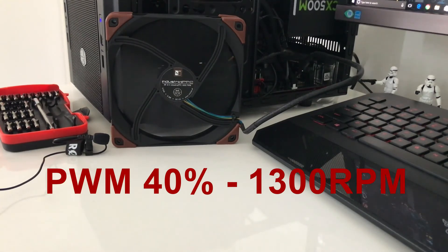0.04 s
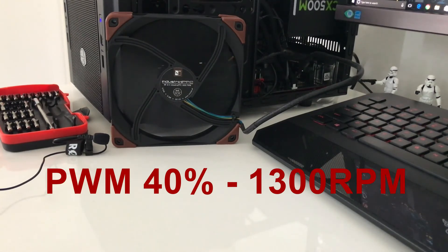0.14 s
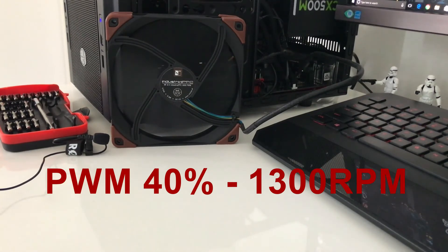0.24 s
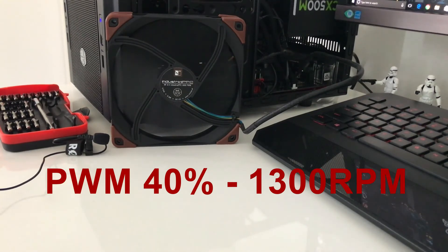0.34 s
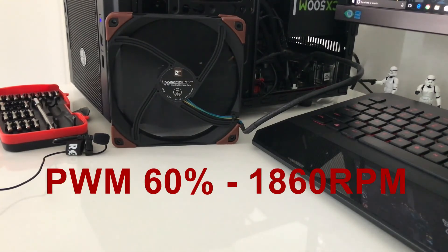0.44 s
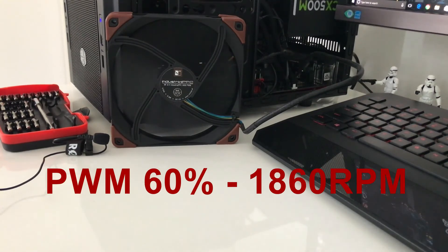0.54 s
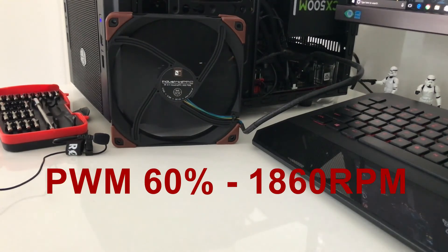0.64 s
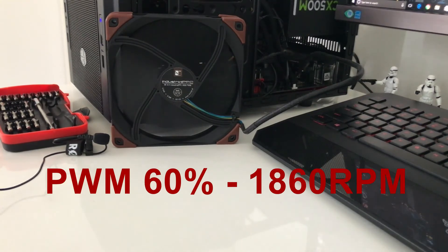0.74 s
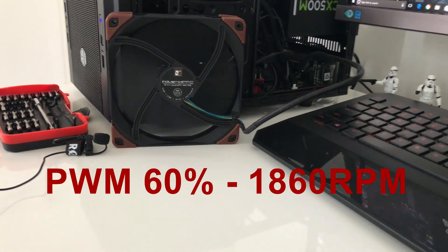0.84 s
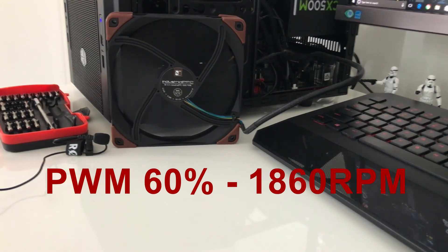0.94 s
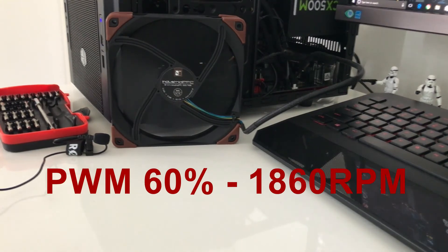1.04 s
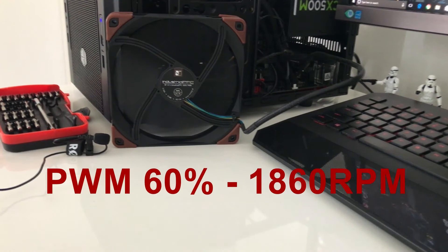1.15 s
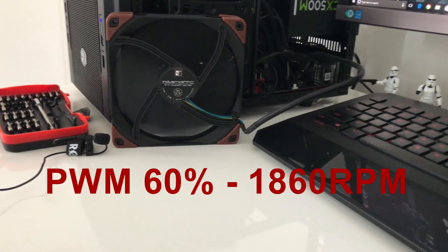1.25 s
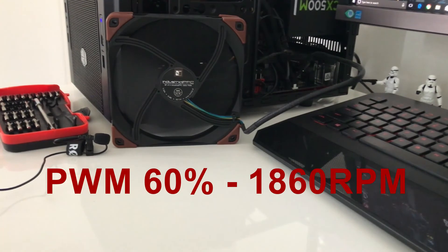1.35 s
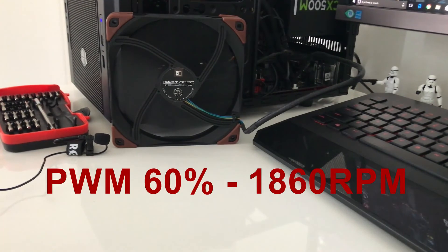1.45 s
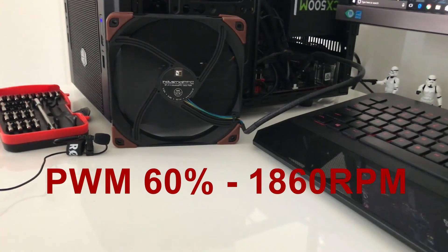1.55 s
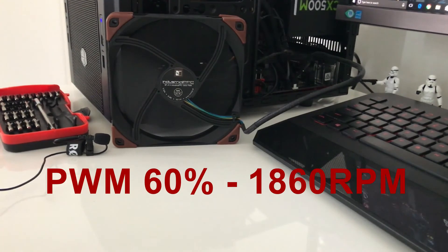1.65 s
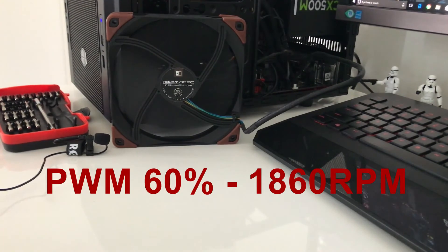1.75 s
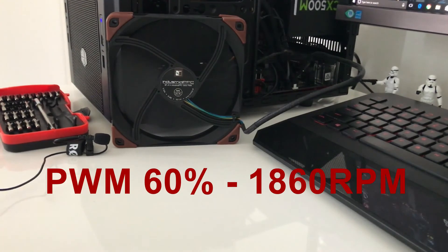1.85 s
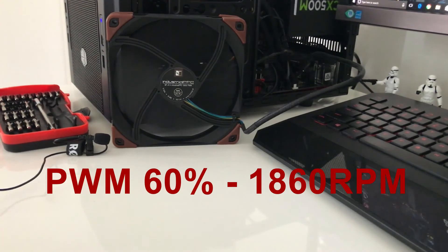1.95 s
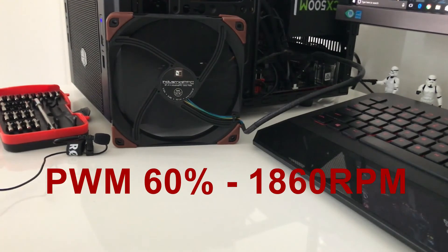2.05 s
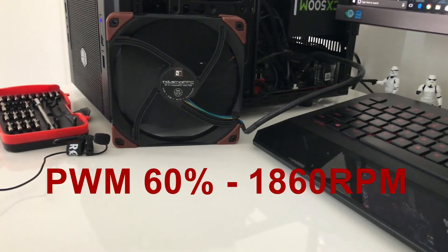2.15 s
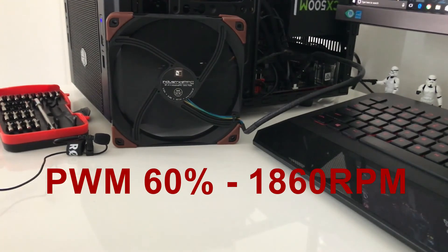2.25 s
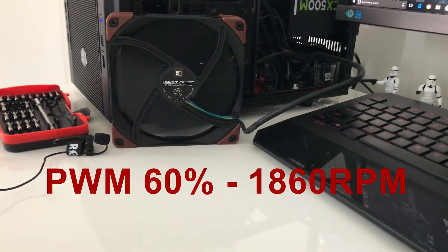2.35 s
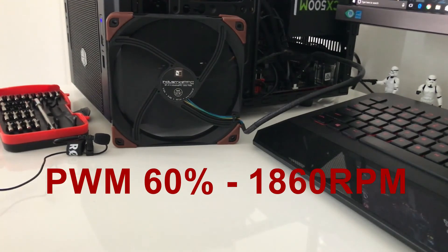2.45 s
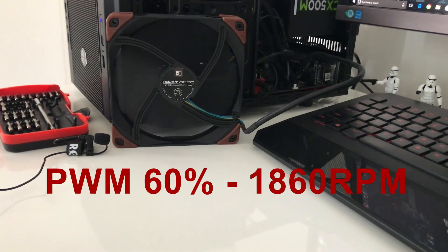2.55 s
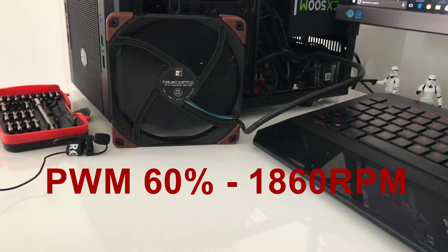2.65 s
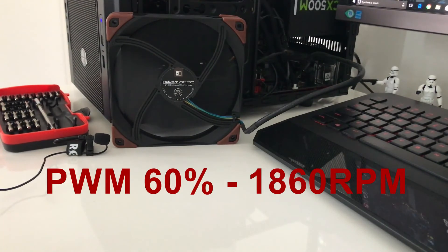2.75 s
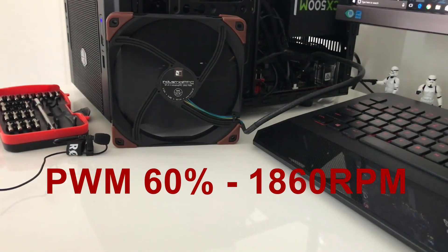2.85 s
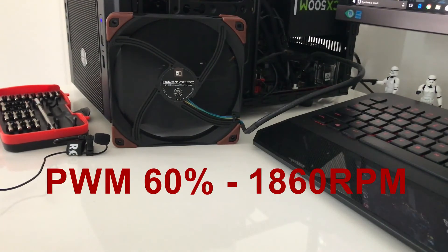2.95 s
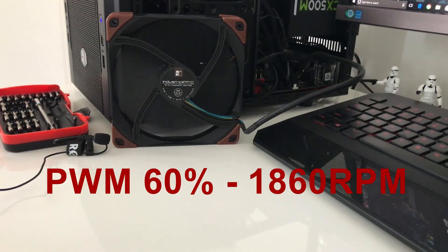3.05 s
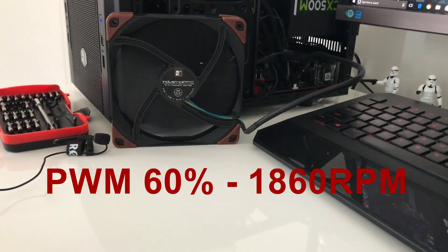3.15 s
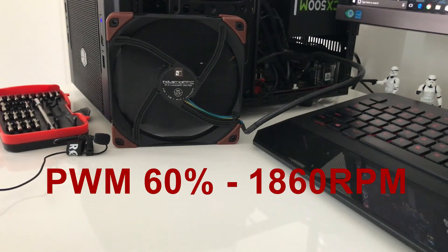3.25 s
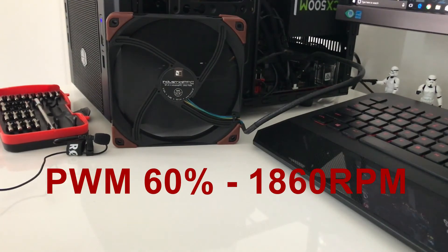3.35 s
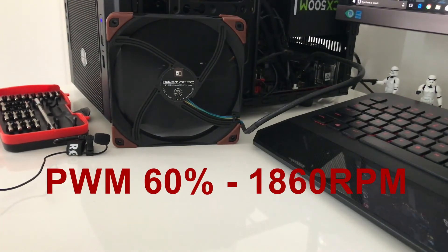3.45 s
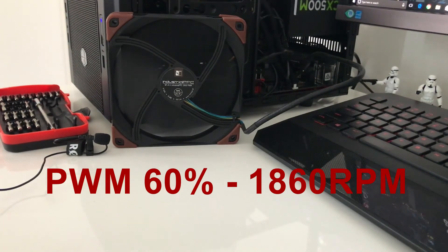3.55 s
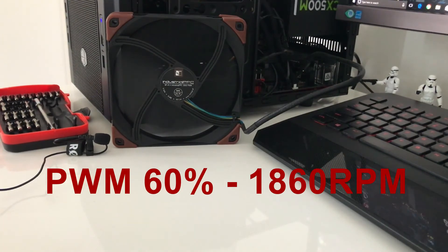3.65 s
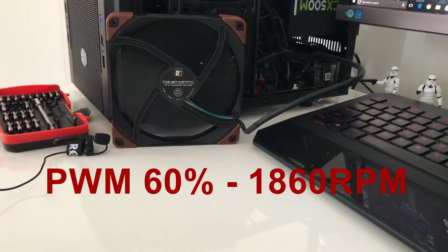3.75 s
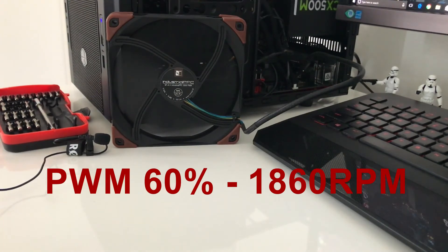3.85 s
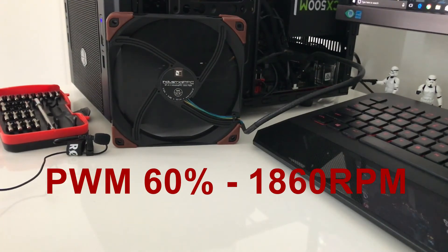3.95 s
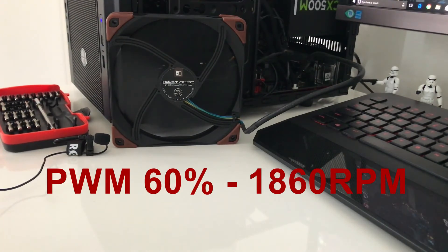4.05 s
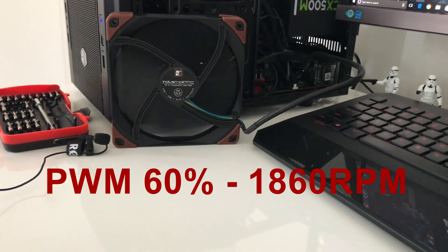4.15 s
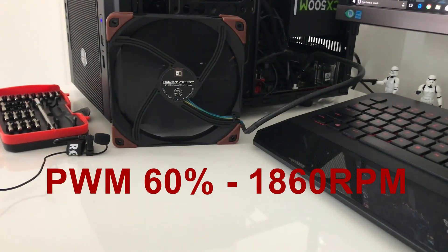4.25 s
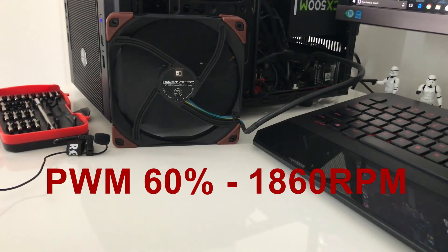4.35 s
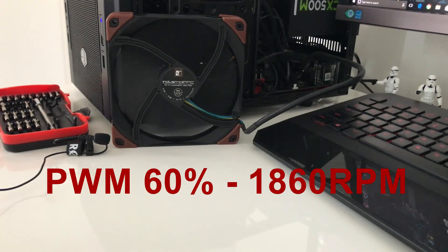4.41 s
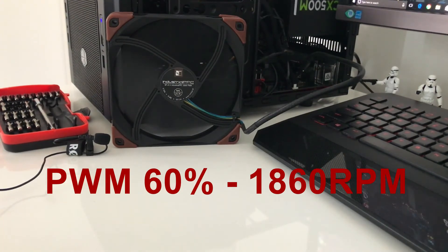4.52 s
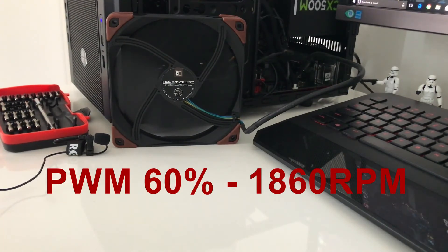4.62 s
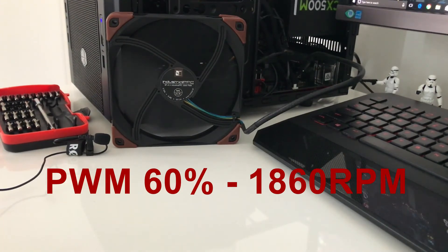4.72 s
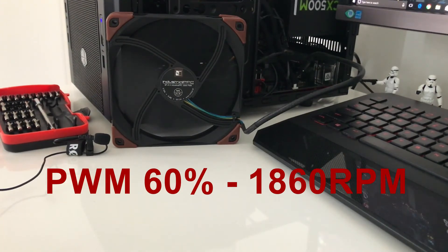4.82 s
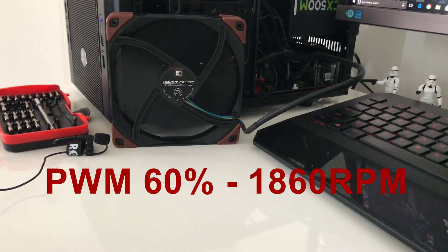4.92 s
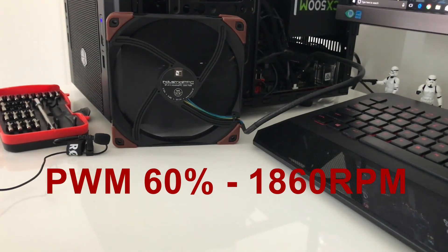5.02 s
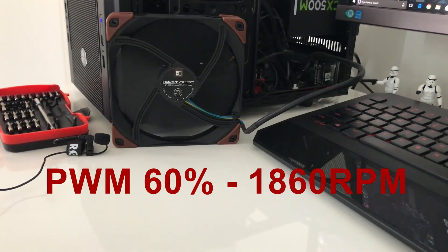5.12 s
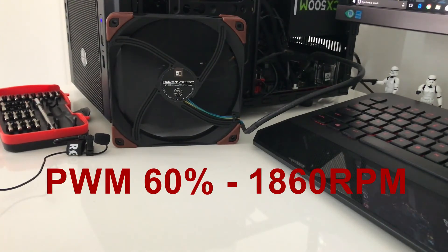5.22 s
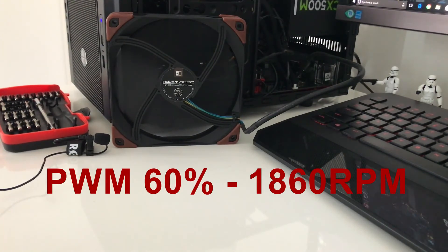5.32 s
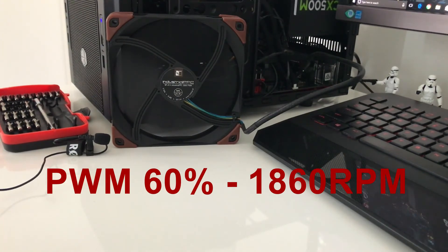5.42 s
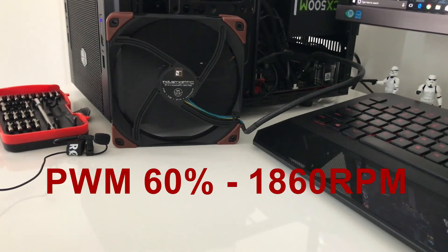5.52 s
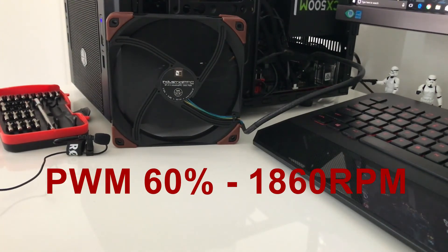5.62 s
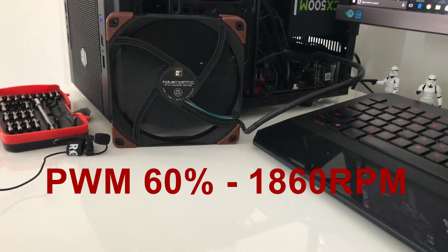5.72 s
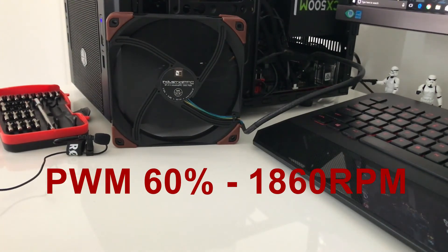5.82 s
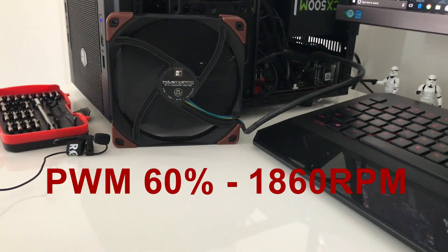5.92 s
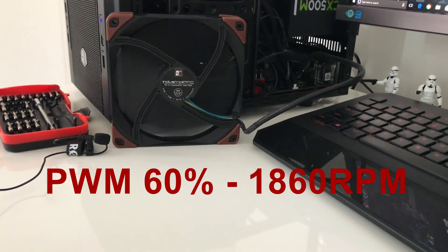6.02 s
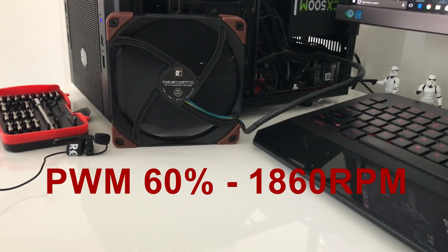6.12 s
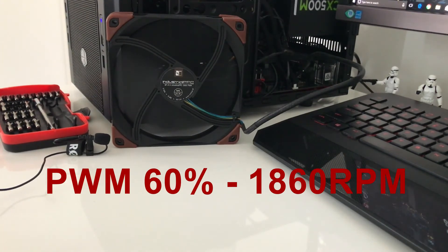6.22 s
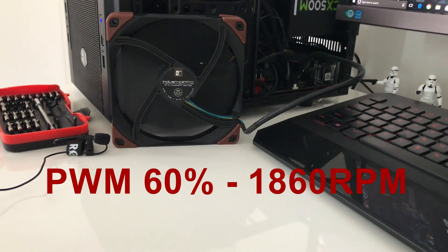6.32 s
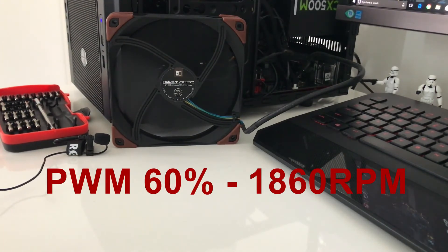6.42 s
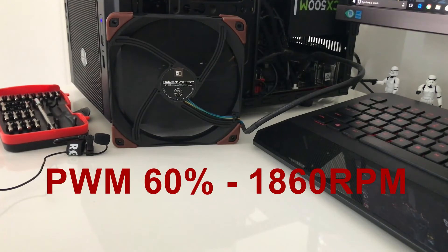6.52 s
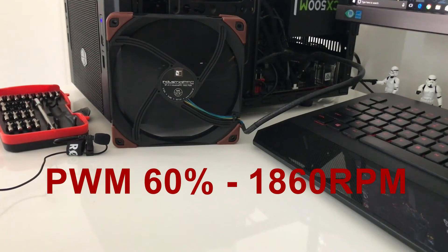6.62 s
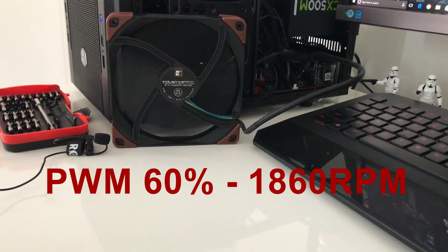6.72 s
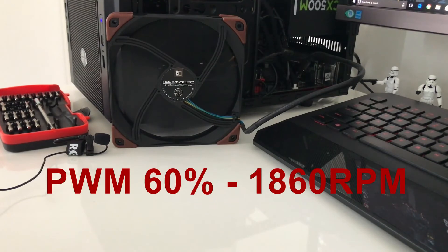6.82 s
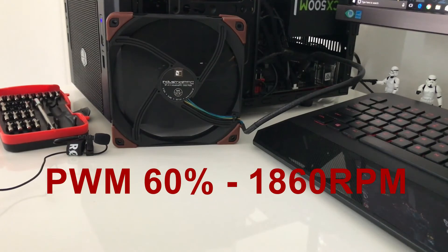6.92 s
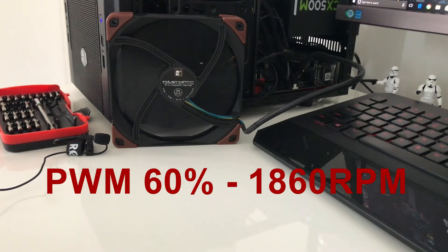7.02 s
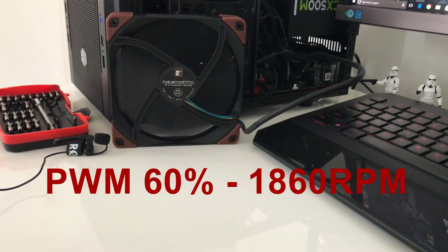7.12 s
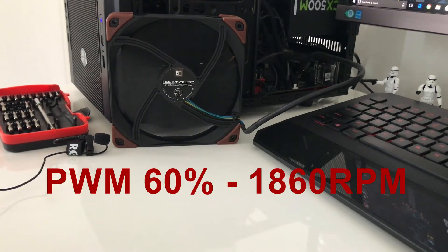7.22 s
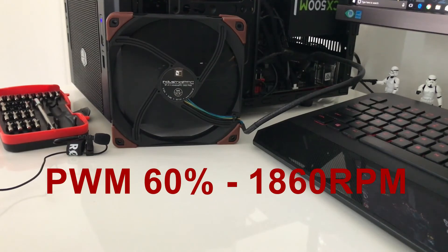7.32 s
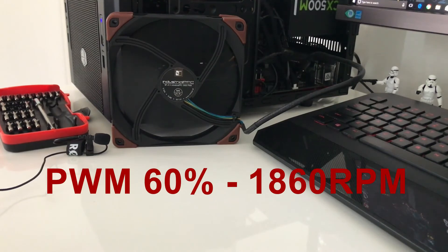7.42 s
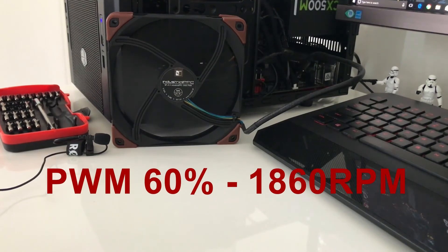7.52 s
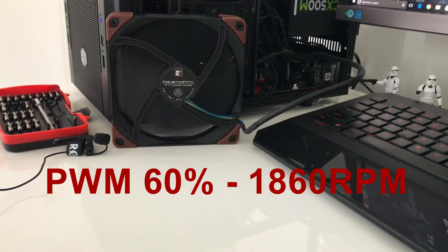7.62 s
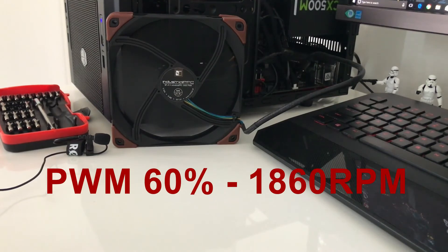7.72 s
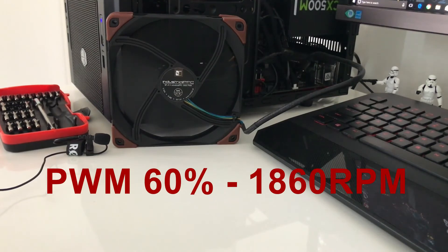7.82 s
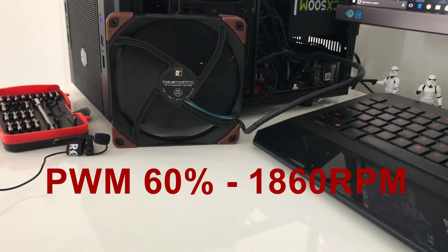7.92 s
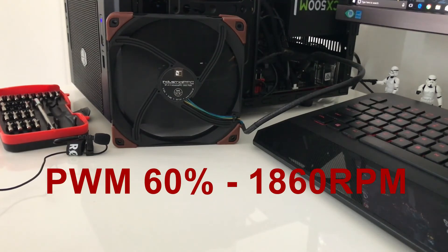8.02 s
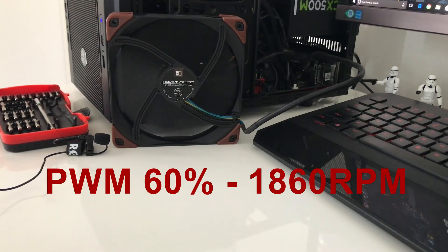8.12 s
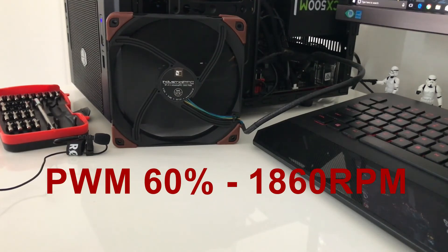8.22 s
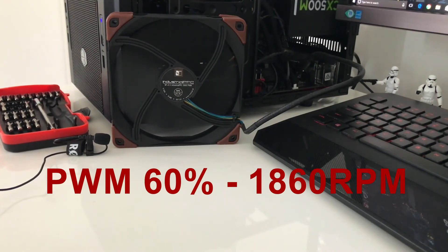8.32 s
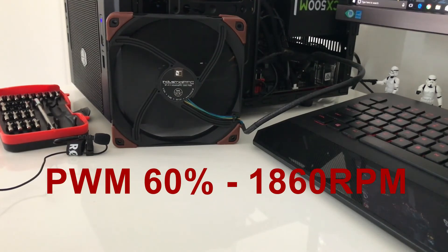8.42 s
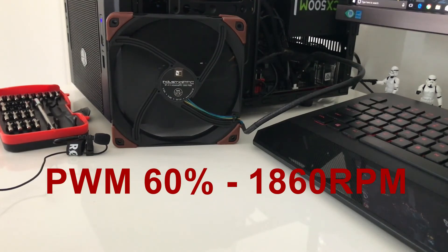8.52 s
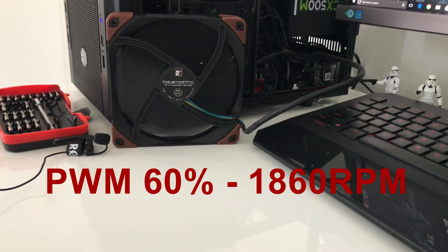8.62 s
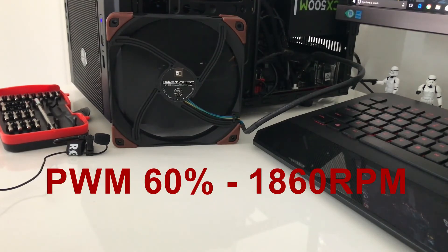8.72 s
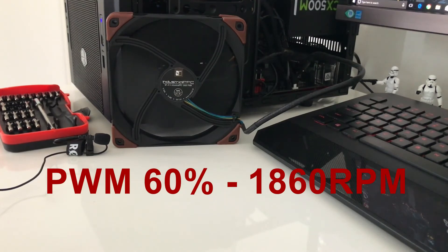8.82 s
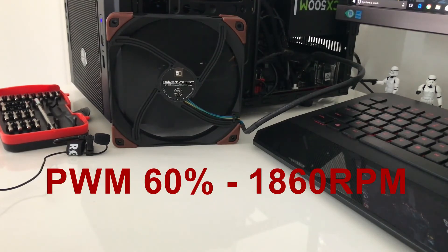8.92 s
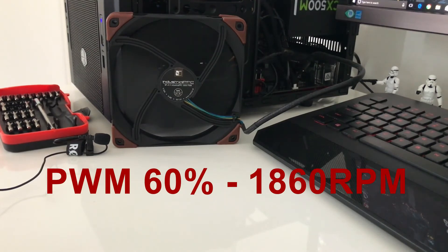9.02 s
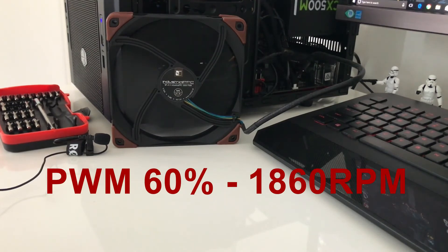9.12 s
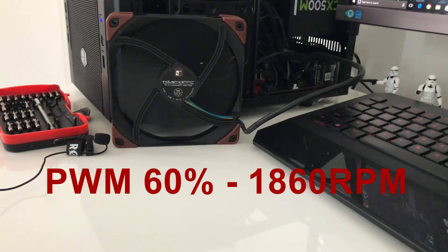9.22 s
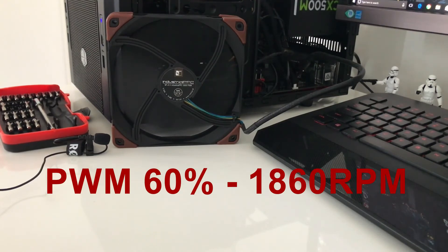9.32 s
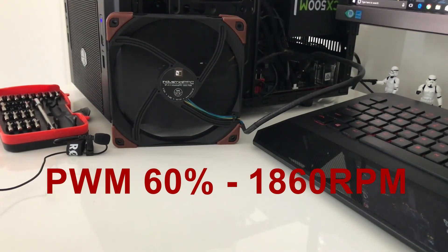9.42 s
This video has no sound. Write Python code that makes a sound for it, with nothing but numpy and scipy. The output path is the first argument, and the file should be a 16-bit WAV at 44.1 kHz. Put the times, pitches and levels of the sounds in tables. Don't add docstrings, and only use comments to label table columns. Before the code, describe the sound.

A computer cooling fan on a desk blows toward a close microphone. For about half a second it gives a low, quiet hum with soft air hiss; then a quick splice, a very brief silence and a faint tick bring in a faster setting, clearly louder and higher. It drones steadily to the end, with a fluttering airflow rush and irregular deep wind thumps. Dry, close, no audible room echo.

```python
import sys
import numpy as np
from scipy import signal
from scipy.fft import rfft, irfft, next_fast_len
from scipy.io import wavfile
from scipy.ndimage import uniform_filter1d

SR = 44100
rng = np.random.default_rng(int(sys.argv[2]) if len(sys.argv) > 2 else 0)


def how_loud(loudness_db):
    steps = np.asarray(loudness_db, float) / 20
    return 10 ** steps


def wav_record(signal):
    frames = np.transpose(np.atleast_2d(signal))
    bounded = np.clip(frames, -1, 1)
    quanta = np.round(bounded * 32767).astype(np.int16)
    wavfile.write(sys.argv[1], SR, quanta)


N = 417186
T = np.arange(N) / SR


def evened(x):
    return x / np.sqrt(np.mean(x ** 2) + 1e-20)


def spectrum_at(points, hz):
    f, value = np.transpose(points)
    return np.interp(np.log(hz + 1), np.log(f + 1), value)


def curve(rows):
    s, value = np.transpose(rows)
    return np.interp(T, s, value)


def coloured(x, gain):
    size = next_fast_len(N)
    spectrum = rfft(x, size) * gain(np.fft.rfftfreq(size, 1 / SR))
    return irfft(spectrum, size)[:N]


def drift(top_hz, size=32):
    count = next_fast_len(N // size + 2)
    hz = np.fft.rfftfreq(count, size / SR)
    slow = irfft(rfft(rng.standard_normal(count)) / (1 + (hz / top_hz) ** 2), count)
    return np.interp(T, np.arange(count) * size / SR, evened(slow))


# f/Hz, level/dB
HISS_COLOUR = [(2000, -16), (6000, -2), (9000, -2), (12000, 0), (13500, -2), (15600, -5)]


def hiss(start_db=-76, end_db=-81, sink_s=.15):
    db = end_db + (start_db - end_db) * np.exp(-T / sink_s)
    noise = coloured(rng.standard_normal(N), lambda hz: how_loud(spectrum_at(HISS_COLOUR, hz)))
    return how_loud(db) * evened(noise)


# t/s, peak level/dB, thump f/Hz, length/s
WHIRLS = [(0.02, -51, 48, 0.15), (0.14, -41, 54, 0.07), (0.27, -40.0, 40, 0.07), (0.677, -26, 31, 0.055),
          (1.175, -32, 48, 0.11), (1.19, -42.0, 148, 0.07), (2.17, -32.5, 55, 0.13), (2.66, -31, 60, 0.14),
          (3.31, -29.5, 89, 0.07), (3.4, -31, 43, 0.06), (3.49, -33.0, 62, 0.19), (3.776, -28, 46, 0.091),
          (3.97, -28, 50, 0.07), (4.133, -31.5, 63, 0.2), (4.65, -28, 37, 0.11), (4.93, -28.5, 50, 0.06),
          (5.45, -29, 61, 0.07), (5.736, -33.0, 51, 0.07), (5.877, -32, 35, 0.049), (6.396, -31, 73, 0.05),
          (6.52, -29, 62, 0.054), (7.025, -29.5, 36, 0.14), (7.33, -25.5, 39, 0.072),
          (7.67, -32, 73, 0.084), (7.764, -29.5, 24, 0.09), (7.94, -28.5, 14, 0.07), (8.175, -30, 56, 0.13),
          (8.52, -32.0, 45, 0.051), (8.7, -28, 43, 0.068), (8.976, -36, 54, 0.059)]


def whirls(span=2.5, stir=0.64, shed_ref_hz=50):
    out = np.zeros(N)
    for (s, db, hz, length_s), (phase, shed) in zip(WHIRLS, rng.random((len(WHIRLS), 2))):
        half_s = span * length_s / 2
        near = slice(max(int((s - half_s) * SR), 0), int((s + half_s) * SR))
        swell = np.cos(np.pi * (T[near] - s) / (span * length_s)) ** 2
        thump = np.cos(2 * np.pi * (hz * T[near] + phase))
        shed_hz = (1.4 + .6 * shed) * hz
        ripple = np.cos(2 * np.pi * (shed_hz * T[near] + shed))
        shed_gain = stir * min(shed_ref_hz / hz, 1) ** 2
        out[near] += how_loud(db) * swell * (thump + shed_gain * swell * ripple)
    return out


# f/Hz, level/dB
LARGE_EDDY = [(3, -21), (12, -3), (30, -4.5), (53, -1.5), (70, -6.5), (100, -36.5), (300, -77)]
SMALL_EDDY = [(20, -59), (50, -21.5), (68, 2), (100, -3.5), (150, -8.5), (220, -15.5), (400, -33),
              (1000, -83)]
# t/s, level/dB over steady strength
BUFFET = [(0, 3), (.3, 0.5), (.42, -4.5), (.66, 1), (.84, -3), (1.1, 1.5), (2.0, -0.5), (3.0, -1),
          (3.45, 1), (4.2, 1.5), (4.45, -0.5), (5.3, -0.5), (6.1, -1), (6.5, -1.5), (6.75, -0.5), (7.3, 0),
          (7.9, 1.5), (9.4, 0.5)]
BUFFET_SHARES = [0.55, 0.79]


def eddies(levels_db):
    out = np.zeros(N)
    for db, colour, share in zip(levels_db, (LARGE_EDDY, SMALL_EDDY), BUFFET_SHARES):
        low = coloured(rng.standard_normal(N), lambda hz: how_loud(spectrum_at(colour, hz)))
        swing = np.sqrt(uniform_filter1d(low ** 2, size=6000))
        out += how_loud(db + share * curve(BUFFET)) * low / swing
    return out


def puffs(turns, at, rise, fall, spread_db):
    size, late = np.clip(rng.standard_normal((N // 100, 2)), -2.2, 2.2).T
    lap = turns - at + 1
    count = lap.astype(int)
    phase = np.maximum(lap % 1 - 0.0665 * (late[count] + 1.89), 0)
    return how_loud(spread_db * size[count]) * (1 - np.exp(-phase / rise)) * np.exp(-phase / fall)


# f/Hz, share/1
PUFF_SHARE = [(300, .05), (900, .18), (1800, .33), (3500, .33), (7000, .3), (13000, .4)]
# f/Hz, share/1
GUST_DEPTH = [(300, .3), (1000, .9), (3000, 1.0), (6000, .7), (15000, .4)]


def rush(turns, colour, db, gust_db=0.45, second=0.37):
    chop = puffs(turns, 0.464, 0.023, 0.17, 1.96)
    chop = chop + second * puffs(turns, 0.052, .012, 0.14, 2.9)

    def share(hz):
        return np.clip(spectrum_at(PUFF_SHARE, hz), 0, 1)

    chopped = coloured(evened(chop * rng.standard_normal(N)), lambda hz: np.sqrt(share(hz)))
    smooth = coloured(rng.standard_normal(N), lambda hz: np.sqrt(1 - share(hz)))
    hz, t, z = signal.stft(chopped + smooth, SR, nperseg=512)
    gust = drift(23)
    gust = np.interp(t, T, gust - uniform_filter1d(gust, size=12000))
    z = z * how_loud(gust_db * spectrum_at(GUST_DEPTH, hz)[:, None] * gust)
    air = signal.istft(z, SR, nperseg=512)[1][:N]
    return how_loud(db) * evened(coloured(air, lambda hz: how_loud(spectrum_at(colour, hz))))


def hum(turns, strong_db, weak, waver_hz=14, waver=0.26, steady_waver=0.026):
    out = np.zeros(N)
    for order, db in [*zip((1, 2, 3, 5), strong_db), *weak]:
        depth = steady_waver if order == 1 else waver
        shake = depth * (drift(waver_hz) + 1j * drift(waver_hz))
        spin = np.exp(2j * np.pi * (order * turns + rng.random() * (order > 1)))
        out += how_loud(db) * np.sqrt(2) * ((1 + shake) * spin).real
    return out


def fan(pass_hz, strong_db, weak, eddy_db, colour, air_db):
    turns = np.cumsum(pass_hz * np.ones(N)) / SR
    air = rush(turns, colour, air_db + 5.5)
    return hum(turns, strong_db, weak) + air + eddies(eddy_db)


SLOW_ORDERS_DB = [-35.5, -55, -63, -61]
# order/1, rms level/dB
SLOW_WEAK = [(4, -72), (6, -73), (7, -72)]
# f/Hz, level/dB
SLOW_RUSH = [(80, -33), (200, -5), (350, -3.5), (600, -6.5), (1000, -10.5), (2000, -17), (3500, -24.5),
             (5500, -34), (7000, -39), (10000, -43), (15600, -53)]


def slow_fan(pass_hz=157.14, air_db=-55.5):
    return fan(pass_hz, SLOW_ORDERS_DB, SLOW_WEAK, [-39, -44], SLOW_RUSH, air_db)


FAST_ORDERS_DB = [-29.5, -51.5, -52, -54.5]
SKEW_SWING_DB = [0.17, 0, 4, -0.6]
AGING_DB_PER_S = [-0.031, 0.077, 0.042, -0.24]
# t/s, skew/1
INFLOW_SKEW = [(.8, -1.1), (1.15, 0.25), (1.8, -0.98), (2.2, 0.16), (3.25, 0.36), (3.95, -1.9),
               (4.65, -0.56), (5.0, 0.43), (6.5, 0.65), (7.1, 0.17), (7.8, -0.39), (8.15, 0.87),
               (9.3, 0.21)]
# order/1, rms level/dB
FAST_WEAK = [(4, -60), (6, -65), (7, -69), (9, -70)]
# f/Hz, level/dB
FAST_RUSH = [(80, -29), (200, 5.5), (300, 0), (500, -0.5), (1000, -4.5), (2000, -9.5), (3200, -14),
             (5000, -21), (6200, -26), (7200, -32), (8500, -32), (11000, -34.5), (13000, -38), (15600, -48)]


def fast_fan(pass_hz=219.42, lag_hz=2.2, step_s=.6, settle_s=.6, air_db=-47):
    speed_hz = pass_hz - lag_hz * np.exp(-np.maximum(T - step_s, 0) / settle_s)
    skew = curve(INFLOW_SKEW)
    orders_db = [db + swing_db * skew + aging * (T - T.mean())
                 for db, swing_db, aging in zip(FAST_ORDERS_DB, SKEW_SWING_DB, AGING_DB_PER_S)]
    return fan(speed_hz, orders_db, FAST_WEAK, [-34, -37.5], FAST_RUSH, air_db)


def gap_remnant(fast, gap_db=-46):
    dull = coloured(fast, lambda hz: (hz / 350) ** 2 / (1 + (hz / 800) ** 10))
    return how_loud(gap_db) * dull * (T > .566) * (T < .582)


def cut_tick(cut_s=.5941, cut_db=-37, decay_s=.0003):
    return how_loud(cut_db) * (T >= cut_s) * np.exp(-abs(T - cut_s) / decay_s)


# t/s, gain/1
SLOW_GATE = [
    (0, 0),
    (.003, 1),
    (.5445, 1),
    (.549, 0),
]
FAST_GATE = [
    (.5465, 0),
    (.5468, 1),
    (.554, .95),
    (.5685, 0),
    (.5941, 0),
    (.5948, 1),
]


def scene():
    slow = slow_fan() + hiss()
    fast = fast_fan()
    thumps = whirls()
    mix = (slow + thumps) * curve(SLOW_GATE) + (fast + thumps) * curve(FAST_GATE)
    return (mix + gap_remnant(fast) + cut_tick())[None]


def low_pass(x):
    return signal.sosfilt(signal.butter(12, 15650, fs=SR, output="sos"), x)


def record(dry):
    return low_pass(dry)


dry = scene()
out = record(dry)
wav_record(out)
```